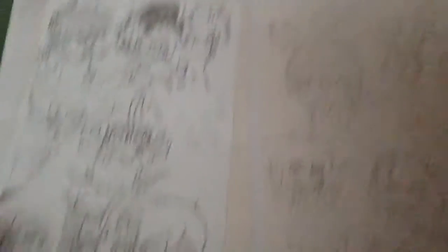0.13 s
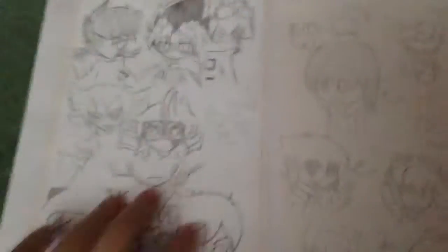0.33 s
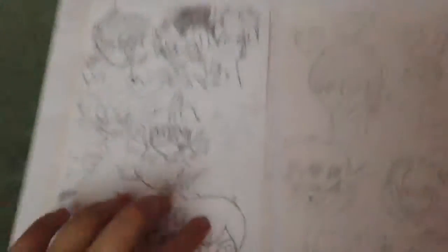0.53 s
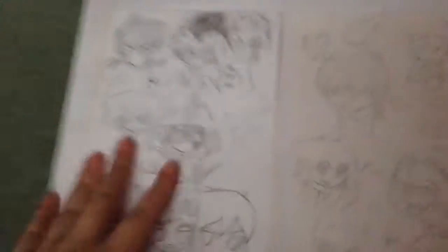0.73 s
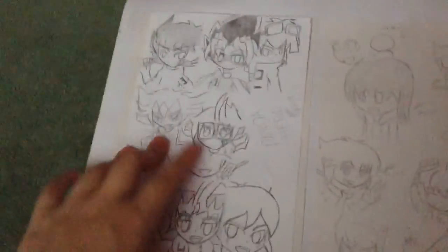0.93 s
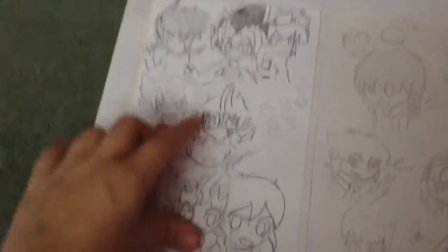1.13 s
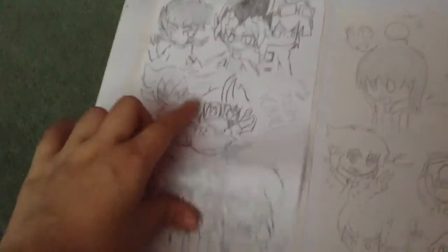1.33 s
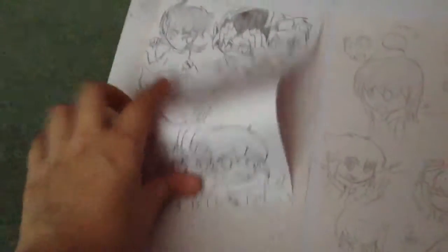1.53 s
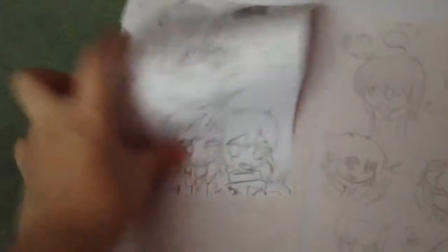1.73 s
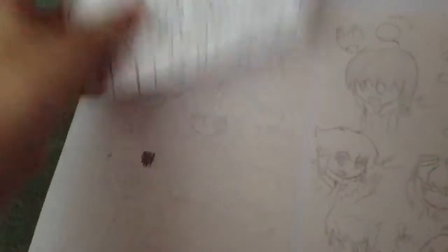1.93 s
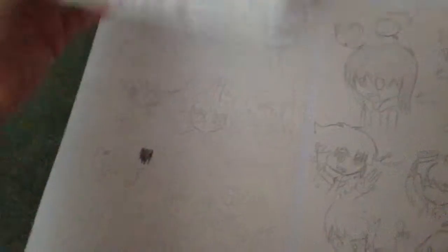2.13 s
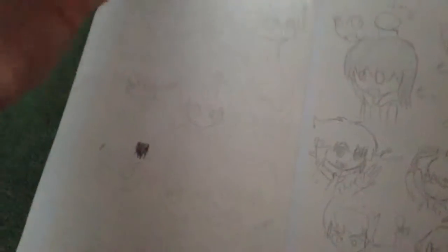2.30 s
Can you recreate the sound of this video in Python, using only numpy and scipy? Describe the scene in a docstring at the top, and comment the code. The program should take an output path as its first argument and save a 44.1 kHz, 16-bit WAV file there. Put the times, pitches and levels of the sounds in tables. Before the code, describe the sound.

A sketchbook page is brushed by a hand, then turned with a papery swish.

```python
"""Turning a sketchbook page

A hand brushes over the page and the thumb drags the corner up with a long swish: sliding friction,
heard as dense fibre clicks. The sheet buckles with damped pops and dry snaps, flips over and settles,
creaking as short slips at the binding excite its modes. A mono phone microphone stands close by,
in a quiet room with a low hum."""
import sys
import numpy as np
from scipy import signal
from scipy.fft import rfft, irfft
from scipy.io import wavfile
from scipy.ndimage import uniform_filter1d

SR = 44100
rng = np.random.default_rng(int(sys.argv[2]) if len(sys.argv) > 2 else 0)


def master_out(mix):
    """Clip the mix to full scale and print it as 16-bit PCM to the path in sys.argv[1]."""
    frames = np.transpose(np.atleast_2d(mix))
    ceiling = np.clip(frames, -1, 1)
    pcm = np.round(ceiling * 32767).astype(np.int16)
    wavfile.write(sys.argv[1], SR, pcm)


N = 108574


def undb(db):
    """Amplitude ratio of a level in decibels."""
    return 10 ** (np.asarray(db) / 20)


def unit_rms(x):
    """Normalisation to an rms of 1."""
    return x / np.sqrt(np.mean(x ** 2))


def bandpass(x, low_hz, high_hz):
    """Third-order Butterworth band-pass filtering."""
    return signal.sosfilt(signal.butter(3, [low_hz, high_hz], "band", fs=SR, output="sos"), x)


def fluctuation(rate_hz):
    """Slow random modulation: values held for 1 / rate_hz seconds and smoothed twice."""
    hold = int(SR / rate_hz)
    steps = np.repeat(rng.standard_normal(N // 100), hold)[:N]
    return unit_rms(uniform_filter1d(uniform_filter1d(steps, hold), hold))


# Spectrum of room tone and microphone hiss: f/Hz, relative spectral level/dB
ROOM_SPECTRUM = [(15, -42), (25, -12), (80, -12), (108, -3), (178, 1.5), (270, -4.5), (719, -18.5),
                 (1330, -15.5), (1450, -18), (1570, -21.5), (1700, -18), (3150, -20.5), (4470, -20),
                 (4850, -21), (15400, -20)]
def room(floor_db=-63.5, hum_db=-70, hum_hz=176.8, hum_width_hz=40):
    """Spectral shaping: steady coloured noise, with a wavering narrow band heard as a hum."""
    hz, db = np.array(ROOM_SPECTRUM).T
    f = np.arange(N // 2 + 1) * SR / N + 1  # 1 Hz up keeps the logarithm finite
    colour = undb(np.interp(np.log(f), np.log(hz), db))
    floor = irfft(rfft(rng.standard_normal(N)) * colour, N)
    hum = bandpass(rng.standard_normal(N), hum_hz - hum_width_hz / 2, hum_hz + hum_width_hz / 2)
    waver_db = 2 * fluctuation(rate_hz=9)
    return undb(floor_db) * unit_rms(floor) + undb(hum_db + waver_db) * unit_rms(hum)


# Bands of the friction noise, highest first: lower f/Hz, upper f/Hz
FRICTION_BANDS = [(11000, 16500), (7000, 11000), (3000, 7000), (1750, 3000), (950, 1750), (350, 950)]
# Skin and paper sliding on paper, four gestures: t/s, then level/dB in each of the six bands
HAND_BRUSH = [(0.0, -64, -63, -59, -62.5, -62.5, -63.5), (0.04, -63.5, -63.5, -62.5, -65, -66.5, -68),
              (0.182, -60, -62.5, -59.5, -63.5, -64, -71), (0.258, -69, -73, -67, -68.5, -69, -70),
              (0.278, -62, -67, -63, -63, -67, -67), (0.336, -63, -63, -64, -72, -68, -71),
              (0.353, -47.5, -55, -61, -70, -74, -66), (0.376, -47, -52.5, -60.5, -70.5, -77, -77),
              (0.39, -58, -61, -68, -75, -80, -76), (0.425, -63.5, -66, -76, -79, -82, -75),
              (0.45, -73, -75, -89, -90, -86, -74)]
FINGER_RUBS = [(0.45, -76, -78, -86, -85, -84, -82), (0.478, -86, -81, -71, -72, -66, -74),
               (0.508, -61, -66, -65.5, -73, -58, -63.5), (0.54, -56.5, -64, -68.5, -78, -65, -78),
               (0.564, -59, -66, -70, -73, -70, -71), (0.612, -75, -81, -86, -88, -79, -80),
               (0.628, -69, -69, -84, -84, -89, -71), (0.638, -64, -67, -68, -78, -76, -82),
               (0.66, -61, -64.5, -70, -76, -79, -77), (0.68, -70, -75, -82, -90, -90, -76),
               (0.716, -85, -88, -88, -87, -90, -82), (0.742, -84, -83, -86, -90, -80, -75),
               (0.758, -57, -58.5, -63, -76, -67, -65), (0.766, -64, -66, -69, -78, -74, -71.5),
               (0.878, -75, -79, -79, -89, -89, -78), (0.928, -76, -76, -72, -89, -83, -73),
               (0.958, -63, -66, -71, -82, -76, -79), (0.992, -63, -69, -68, -80, -75, -68),
               (1.01, -61, -65, -66.5, -85, -71, -79), (1.042, -88, -86, -86, -81, -82, -77),
               (1.072, -83, -88, -82, -88, -87, -83), (1.092, -59, -62, -65, -75, -68, -73),
               (1.13, -56, -62, -64.5, -74, -85, -80), (1.154, -70, -69, -69.5, -80, -79, -79),
               (1.278, -70, -72, -71.5, -74, -84, -78), (1.296, -66, -69, -67, -73, -90, -87),
               (1.34, -67, -66, -67, -70, -73, -83)]
THUMB_DRAG = [(1.34, -66, -68, -68, -77, -76, -79), (1.358, -64, -66, -65, -73, -75, -80),
              (1.368, -61, -59, -53, -70, -80, -69), (1.384, -51, -43.5, -44, -72, -73, -86),
              (1.41, -49, -45, -46, -65, -68, -81), (1.42, -41.5, -44.5, -48.5, -60, -60, -71),
              (1.46, -44.5, -50, -48, -56, -65.5, -75), (1.524, -40, -44, -44.5, -55, -58.5, -74),
              (1.532, -42, -45, -43.5, -55, -68, -71), (1.538, -41, -43, -44, -56, -61, -71),
              (1.576, -40.5, -42, -42, -53.5, -55.5, -70.5), (1.704, -51.5, -45, -45.5, -60, -62.5, -69),
              (1.72, -51, -51, -48, -67, -59, -58)]
PAGE_FLIP = [(1.72, -53, -49.5, -48.5, -57, -61, -56), (1.762, -47.5, -49, -51.5, -62, -58.5, -72),
             (1.838, -48.5, -53, -54.5, -57, -56.5, -64.5), (1.86, -49, -50.5, -54, -64, -67, -67),
             (1.892, -44, -49, -45, -51.5, -52, -59), (1.906, -45, -44, -49.5, -63, -56, -75),
             (1.914, -52, -51, -53, -61, -60, -61), (1.928, -56, -54, -54.5, -56, -69, -56),
             (1.954, -55, -57, -59, -67, -66, -65), (2.004, -58, -58.5, -60.5, -73, -72, -68),
             (2.022, -56, -58, -57.5, -60.5, -72, -61), (2.056, -55, -59, -62, -70.5, -69, -69.5),
             (2.1, -59, -64, -61, -69, -76, -72), (2.108, -53, -59, -57.5, -58, -79, -61),
             (2.198, -51.5, -46.5, -49, -66, -63.5, -58), (2.22, -62, -59, -62, -61, -60, -64),
             (2.266, -66, -69, -57, -53, -64, -70.5), (2.3, -86, -89, -79, -78, -72, -66),
             (2.32, -85, -85, -84, -70, -82, -70)]
def sliding_friction(clicks_per_s=16000, spread_db=0.5, tail_s=0.00087, flicker_db=1.16):
    """Shot noise: dense fibre clicks with short tails merge into a swish; each band flickers."""
    t = np.arange(N) / SR
    times, *band_levels = np.array(HAND_BRUSH + FINGER_RUBS + THUMB_DRAG + PAGE_FLIP).T
    out = np.zeros(N)
    for (low_hz, high_hz), db in zip(FRICTION_BANDS, band_levels):
        hits = rng.random(N) < clicks_per_s / SR
        clicks = hits * undb(spread_db * rng.exponential(size=N))
        tails = signal.lfilter([1], [1, -np.exp(-1 / (tail_s * SR))], clicks)
        swish = bandpass(tails * rng.standard_normal(N), low_hz, high_hz)
        level_db = np.interp(t, times, db, right=-120) + flicker_db * fluctuation(rate_hz=38)
        out += unit_rms(swish) * undb(level_db)
    return out


def add_event(out, start_s, peak_db, x):
    """Superposition of a short sound, scaled to a given peak level."""
    i = int(start_s * SR)
    out[i:i + len(x)] += undb(peak_db) * x[:N - i] / np.abs(x).max()


def decay(t, t60):
    """Exponential damping: a fall of 60 dB in t60 seconds."""
    return np.exp(-np.log(1000) * t / t60)


# Buckles of the sheet: t/s, peak level/dB, f/Hz, decay time T60/s, rise time/s
BUCKLES = [(0.084, -49, 295, 0.013, 0.0025), (.087, -49, 850, 0.014, 0.0024), (.099, -52, 605, .02, 0.0024),
           (1.715, -42.5, 1300, 0.018, 0.00045), (1.730, -43.5, 820, 0.022, 0.00047),
           (1.737, -43.5, 900, 0.018, 0.00024), (1.745, -47.5, 452, 0.016, 0.00046),
           (1.8193, -39, 501, 0.017, 0.0023), (1.8215, -38, 1207, 0.02, 0.0021),
           (1.883, -34, 1380, 0.0069, 0.00049), (1.889, -45, 310, 0.022, 0.00034),
           (1.896, -39.5, 1030, 0.0091, 0.00032), (1.900, -47, 330, 0.02, 0.0011),
           (1.923, -35, 874, 0.019, 0.0035), (1.930, -44, 653, 0.083, 0.0035),
           (2.018, -50, 760, 0.05, 0.0017), (2.143, -45, 700, 0.012, 0.0027),
           (2.1465, -41.5, 603, 0.025, 0.0027), (2.208, -45, 690, 0.035, 0.0023),
           (2.217, -46, 800, 0.015, 0.00064), (2.225, -43, 790, 0.013, 0.0009),
           (2.232, -40, 800, 0.015, 0.0011), (2.243, -46, 810, 0.022, 0.0029),
           (2.250, -46, 680, 0.013, .002)]
def buckling_pops(octave_db=-7, rough_db=-10, rough_ratio=1.6):
    """Damped vibration after buckling: a tone and its octave, roughened by noise near that pitch."""
    out, t = np.zeros(N), np.arange(SR // 10) / SR
    for start_s, db, hz, t60, rise_s in BUCKLES:
        phase = 2 * np.pi * hz * t
        tone = np.sin(phase) + undb(octave_db) * np.sin(2 * phase)
        noise = bandpass(rng.standard_normal(len(t)), hz / rough_ratio, hz * rough_ratio)
        rise = np.sin(np.pi / 2 * np.minimum(t / rise_s, 1)) ** 2
        fall = decay(np.maximum(t - rise_s, 0), t60)
        add_event(out, start_s, db, (tone + undb(rough_db) * unit_rms(noise)) * rise * fall)
    return out


# Dry snaps: t/s, peak level/dB, decay time constant/s, lower band edge f/Hz
SNAP_BURSTS = [(0.7543, -49, .0005, 1500), (0.757, -38, 0.00066, 1500), (.7604, -44, .001, 3000),
               (1.823, -32, .001, 2500), (1.888, -24, 0.001, 2300), (1.9, -34, 0.0016, 5000),
               (1.925, -48, .002, 2500), (2.027, -37, 0.0023, 4000)]
def dry_snaps(top_hz=21600):
    """Broadband transients: an impulse gives the sharp edge, a noise burst the brief tail."""
    out, t = np.zeros(N), np.arange(SR // 30) / SR
    impulse = 4 * (t == 0)
    for start_s, db, fade_s, low_hz in SNAP_BURSTS:
        burst = (impulse + rng.standard_normal(len(t))) * np.exp(-t / fade_s)
        add_event(out, start_s, db, bandpass(burst, low_hz, top_hz))
    return out


# Slips of the bent page at the binding: t/s, peak level/dB, relative level of the treble modes/dB
BINDING_SLIPS = [(2.2174, -44, -10), (2.2298, -40.5, -3), (2.238, -39, -6), (2.2434, -48, -6),
                 (2.2578, -37.5, 7), (2.2634, -41, -7), (2.2724, -42.5, -6), (2.2844, -47, 0),
                 (2.3351, -52.5, -6), (2.388, -44, 5.5), (2.3944, -50, -13), (2.4114, -53, -2),
                 (2.4195, -59, -9)]
# Modes that the slips excite: f/Hz, relative level/dB, decay time T60/s
SLIP_MODES = [(700, -10, 0.022), (1300, -12.5, 0.0092), (2060, 0, 0.013), (2500, -5, 0.0074),
              (3770, -9, 0.0081), (4630, 2, 0.0063), (7680, -6.5, 0.009), (11100, -9.5, 0.007)]
def binding_creaks(rise_s=0.001, fade_s=0.0035, treble_hz=3000, detune_spread=0.06):
    """Modal resonance: short rough slips ring the same modes, a little detuned every time."""
    out, t = np.zeros(N), np.arange(SR // 20) / SR
    for start_s, db, treble_db in BINDING_SLIPS:
        noise = rng.standard_normal(len(t))
        slip = noise * (1 - np.exp(-t / rise_s)) * np.exp(-t / fade_s)
        detunings = 1 + detune_spread * noise[::-1]
        response = np.zeros(len(t))
        for (hz, mode_db, t60), detuning in zip(SLIP_MODES, detunings):
            gain = undb(mode_db + treble_db * (hz > treble_hz))
            response += gain * np.sin(2 * np.pi * hz * detuning * t) * decay(t, t60)
        add_event(out, start_s, db, signal.fftconvolve(slip, response))
    return out


def scene():
    """Superposition at one microphone, the same on both channels."""
    mono = sliding_friction() + buckling_pops() + dry_snaps() + binding_creaks() + room()
    return np.tile(mono, (2, 1))


def record(dry):
    """Band limiting: the phone drops the deep bass and cuts the top."""
    low_hz, top_hz = 97.5, 15320
    highpass = signal.butter(3, low_hz, "high", fs=SR, output="sos")
    lowpass = signal.ellip(10, 0.2, 75, top_hz, fs=SR, output="sos")
    return signal.sosfilt(lowpass, signal.sosfilt(highpass, dry))


dry = scene()
out = record(dry)
master_out(out)
```